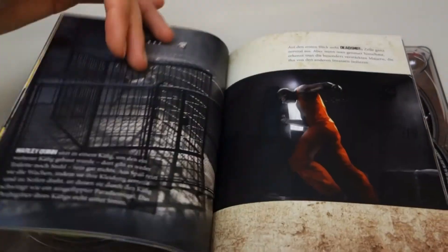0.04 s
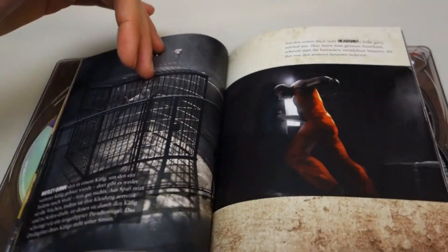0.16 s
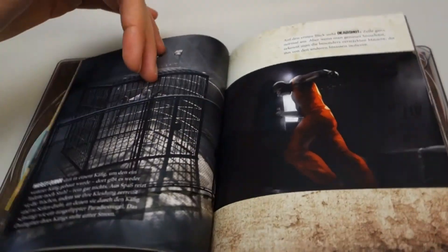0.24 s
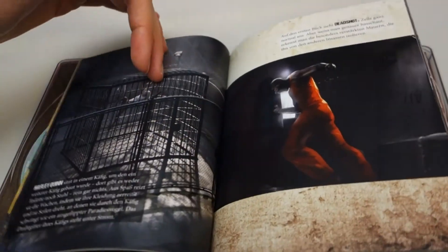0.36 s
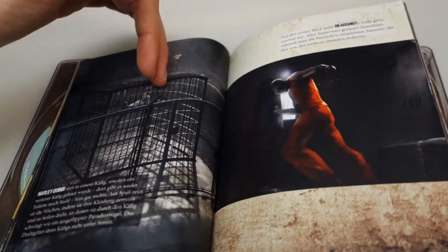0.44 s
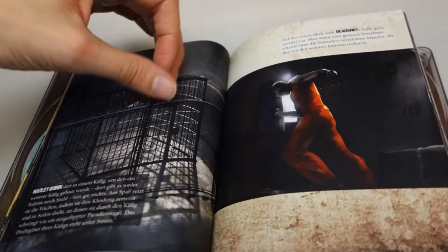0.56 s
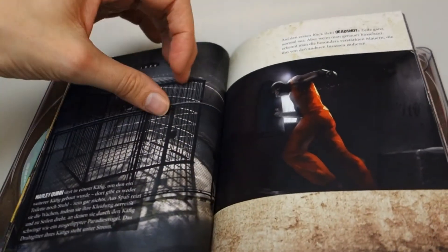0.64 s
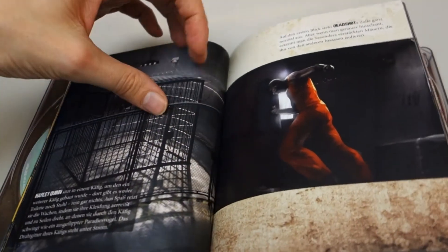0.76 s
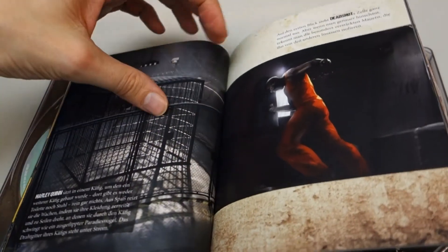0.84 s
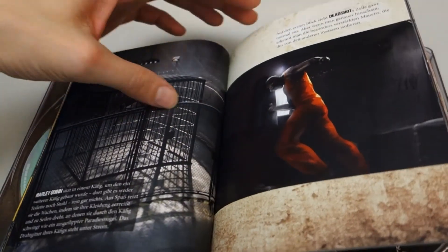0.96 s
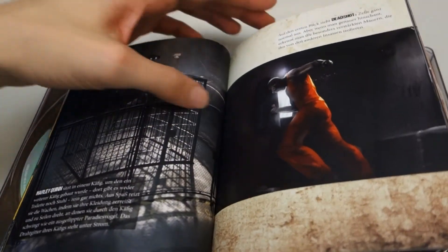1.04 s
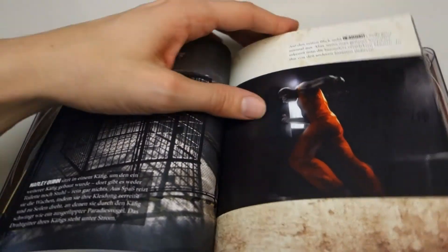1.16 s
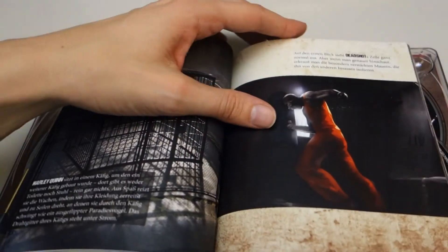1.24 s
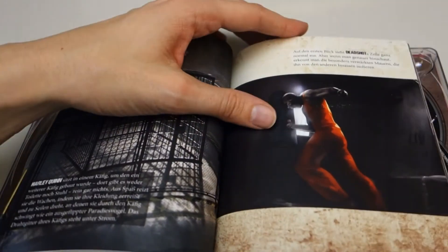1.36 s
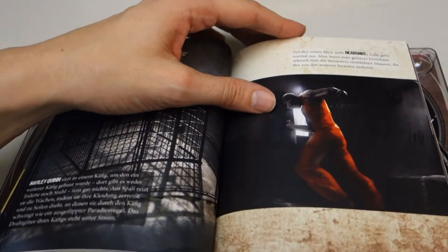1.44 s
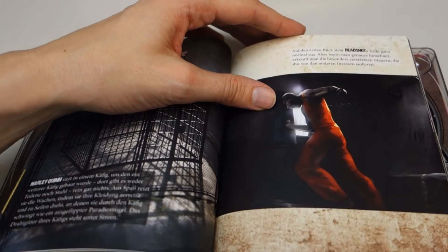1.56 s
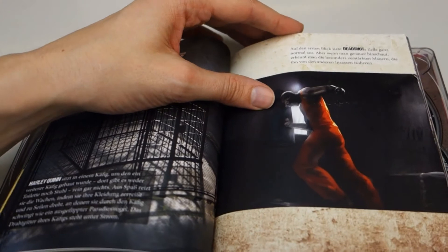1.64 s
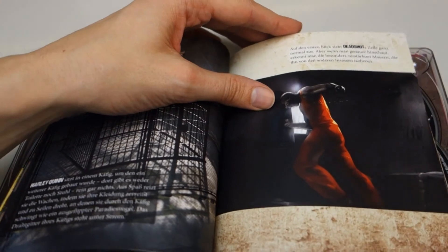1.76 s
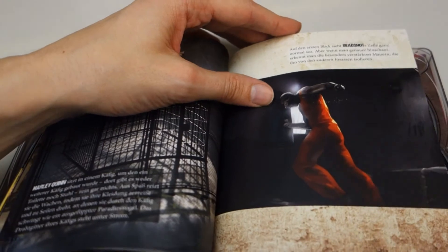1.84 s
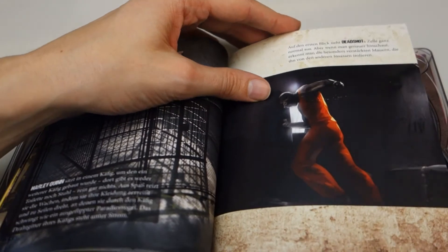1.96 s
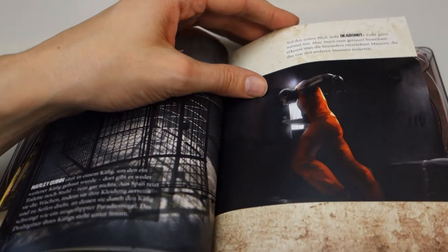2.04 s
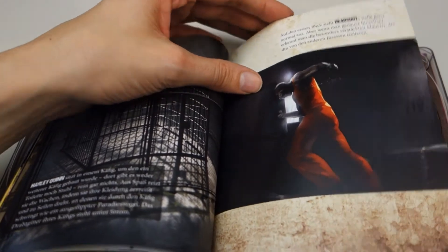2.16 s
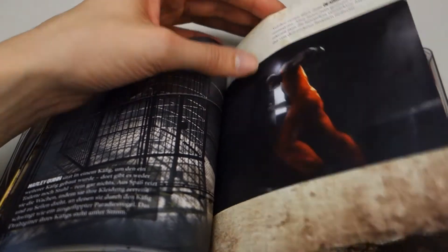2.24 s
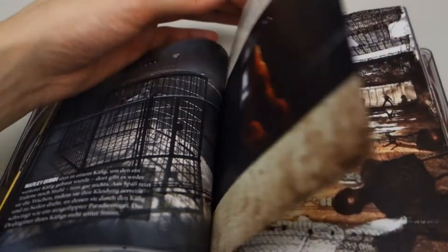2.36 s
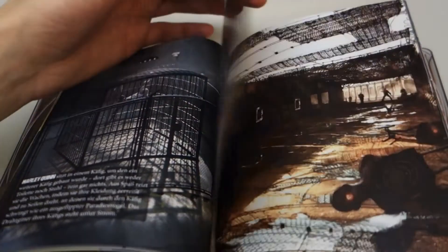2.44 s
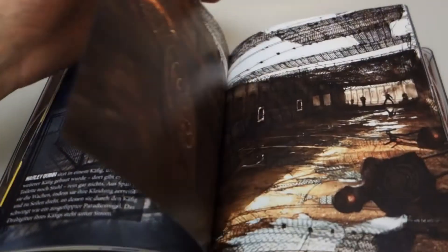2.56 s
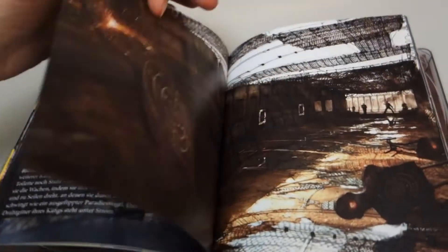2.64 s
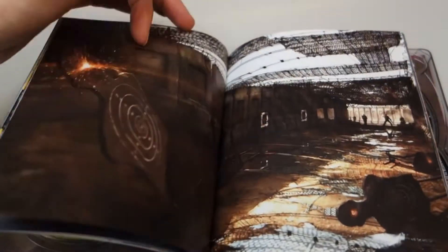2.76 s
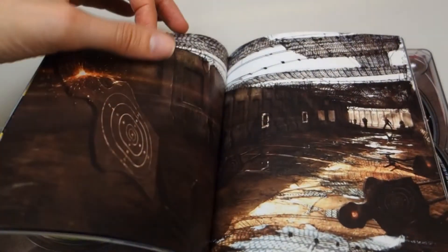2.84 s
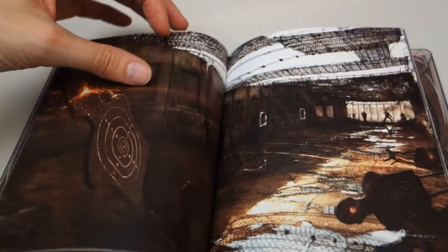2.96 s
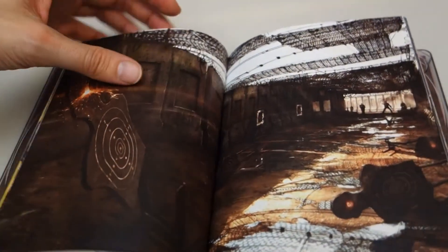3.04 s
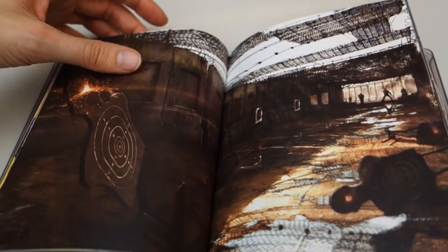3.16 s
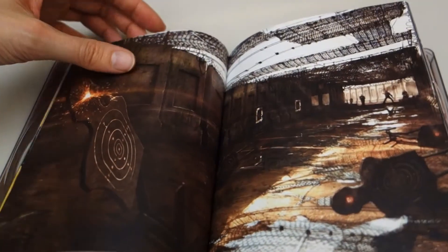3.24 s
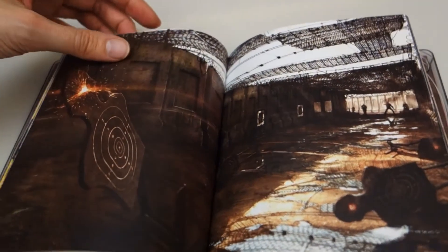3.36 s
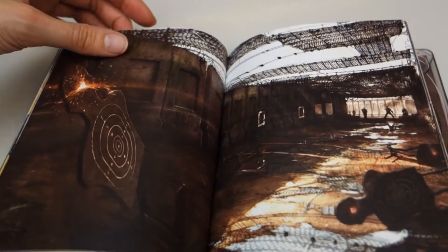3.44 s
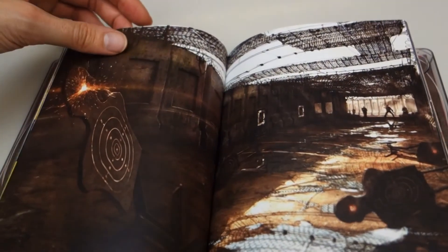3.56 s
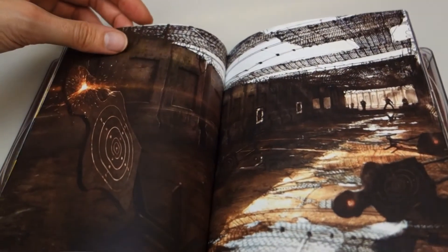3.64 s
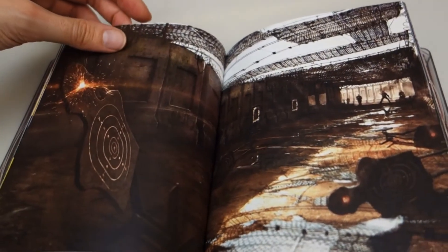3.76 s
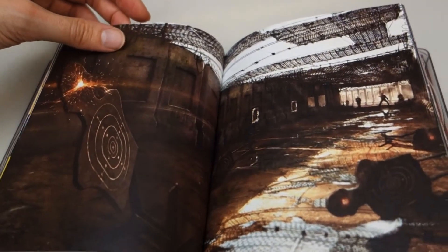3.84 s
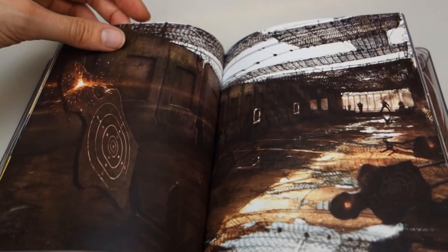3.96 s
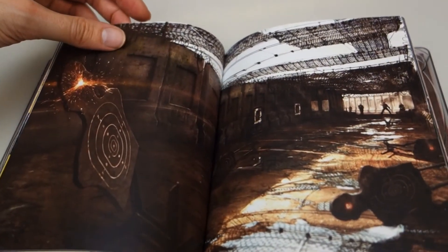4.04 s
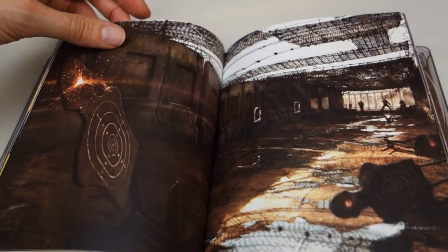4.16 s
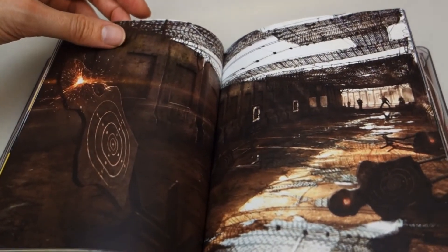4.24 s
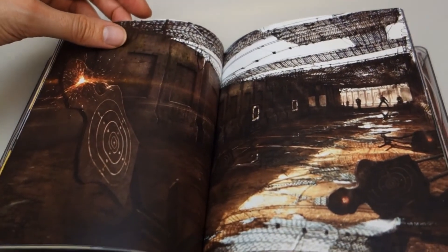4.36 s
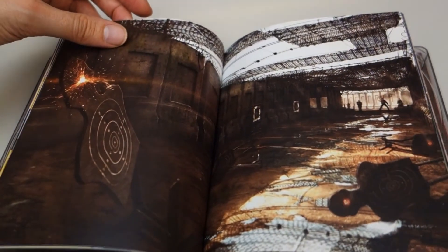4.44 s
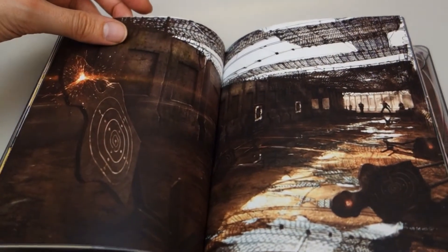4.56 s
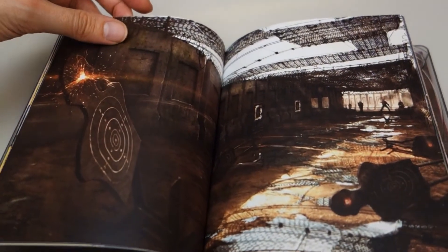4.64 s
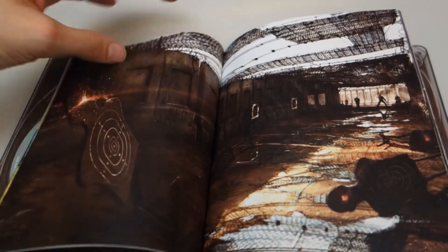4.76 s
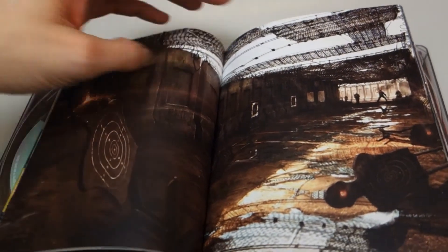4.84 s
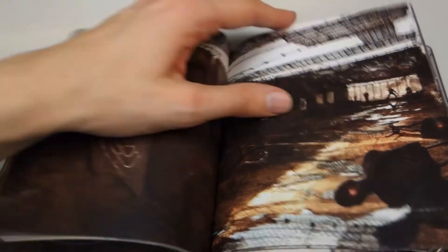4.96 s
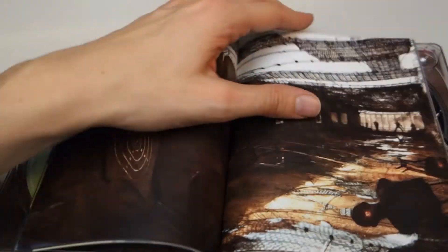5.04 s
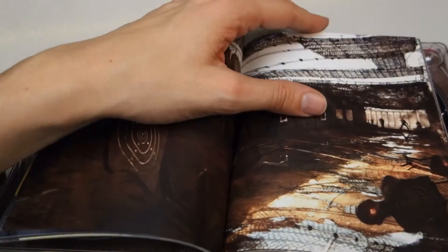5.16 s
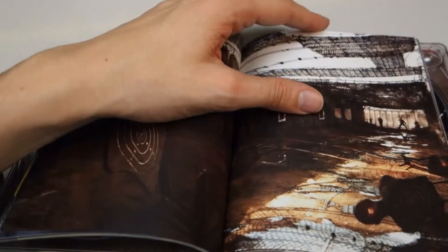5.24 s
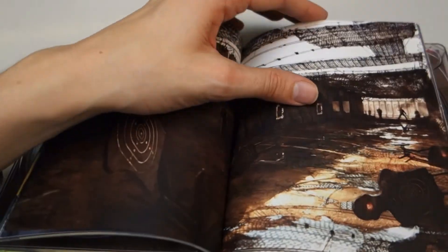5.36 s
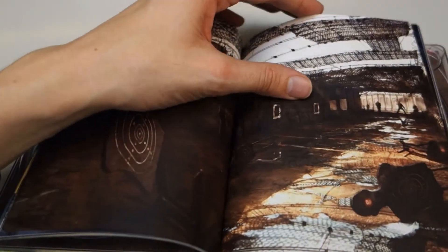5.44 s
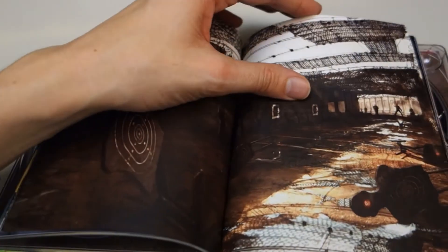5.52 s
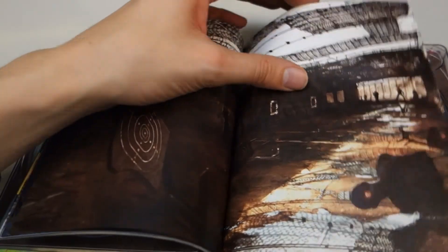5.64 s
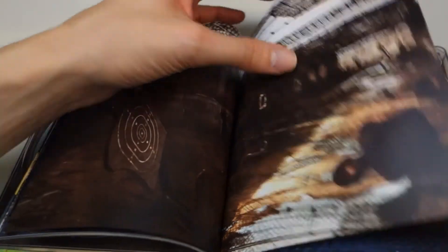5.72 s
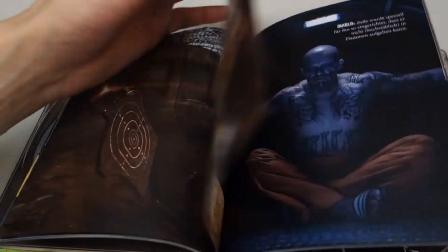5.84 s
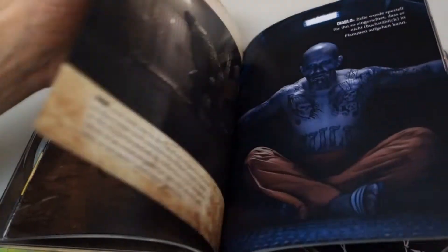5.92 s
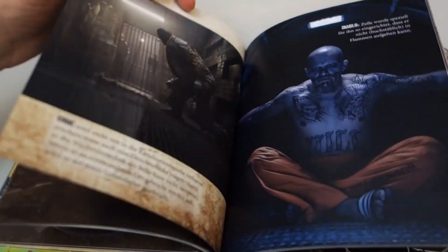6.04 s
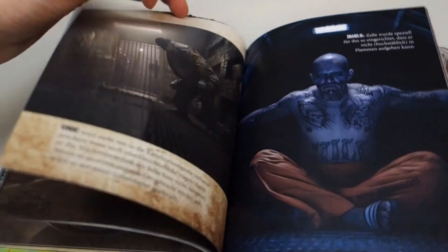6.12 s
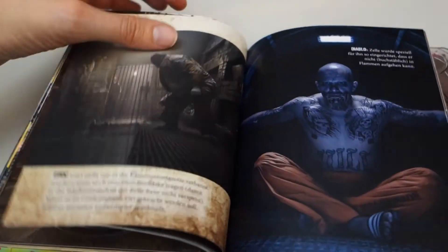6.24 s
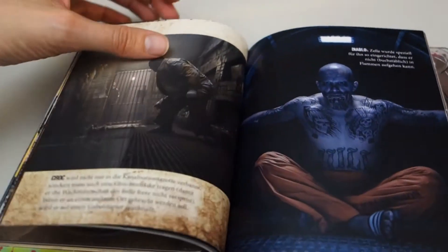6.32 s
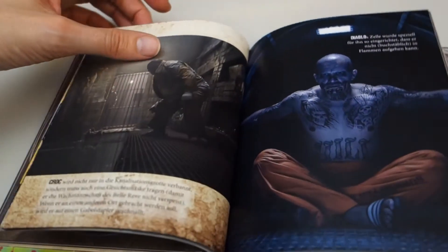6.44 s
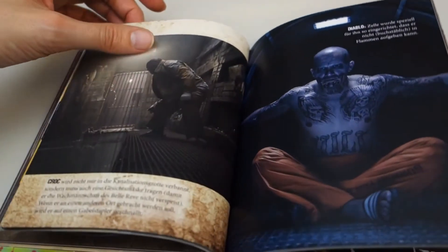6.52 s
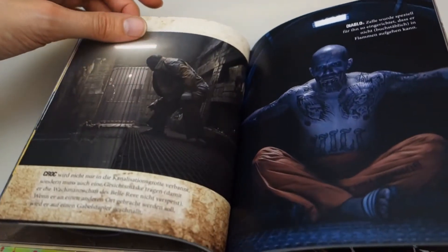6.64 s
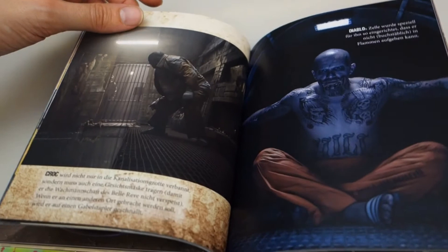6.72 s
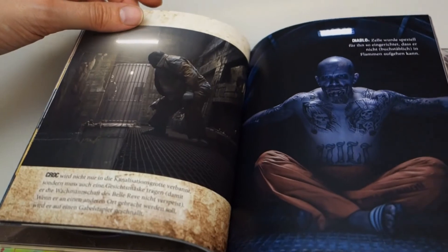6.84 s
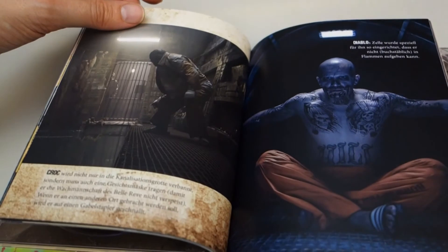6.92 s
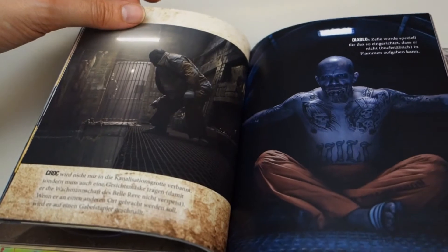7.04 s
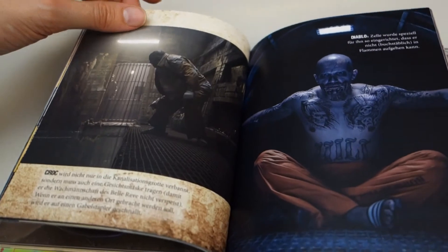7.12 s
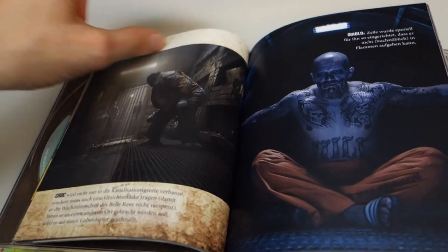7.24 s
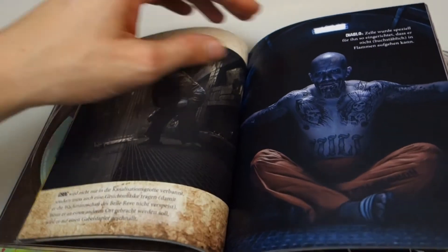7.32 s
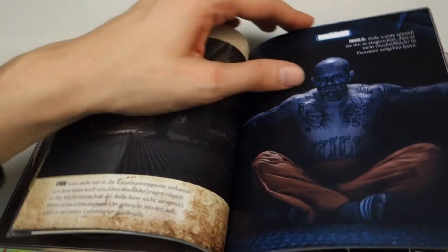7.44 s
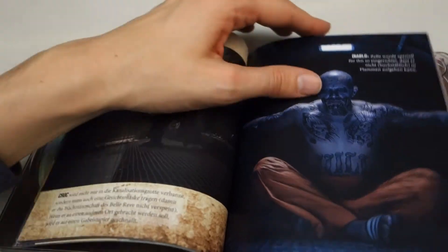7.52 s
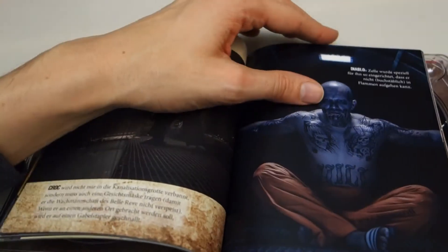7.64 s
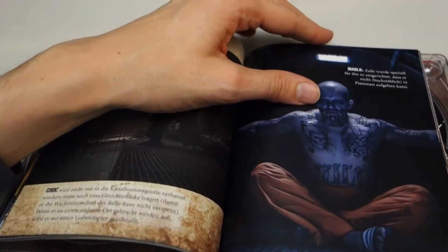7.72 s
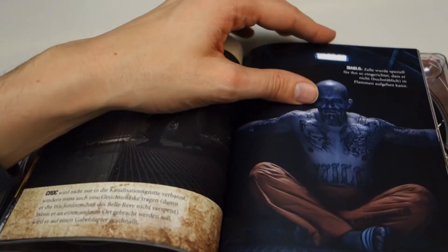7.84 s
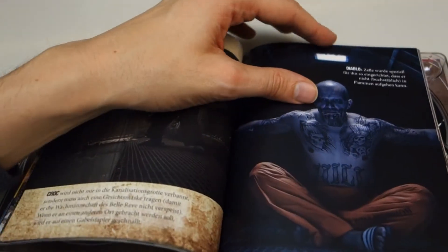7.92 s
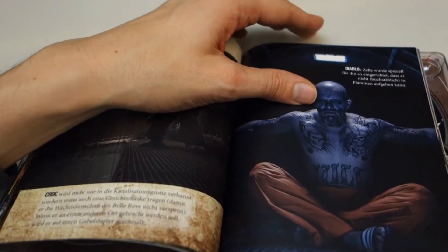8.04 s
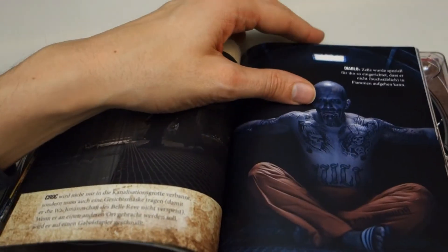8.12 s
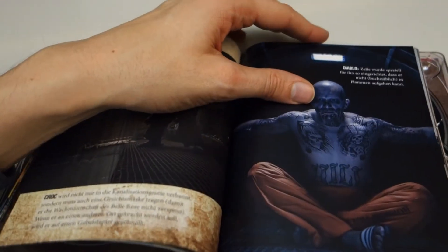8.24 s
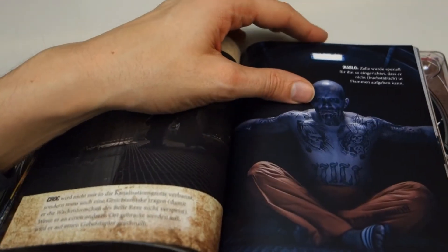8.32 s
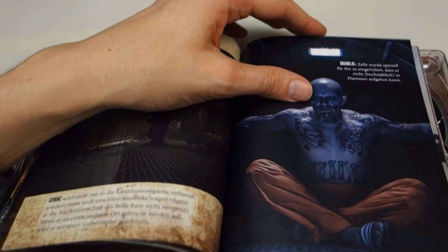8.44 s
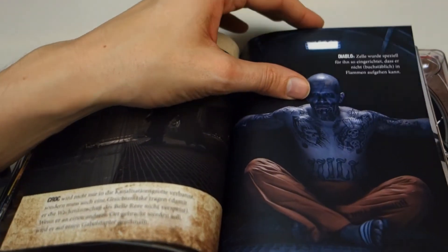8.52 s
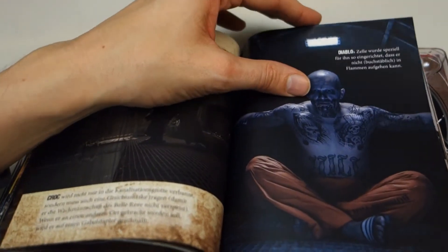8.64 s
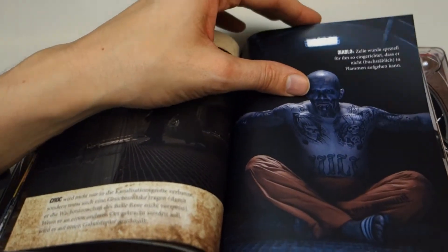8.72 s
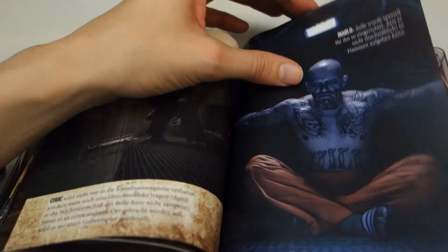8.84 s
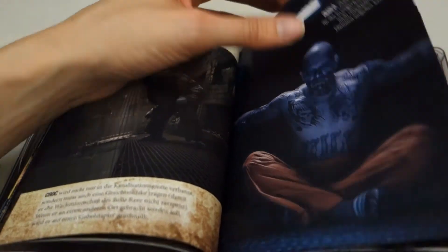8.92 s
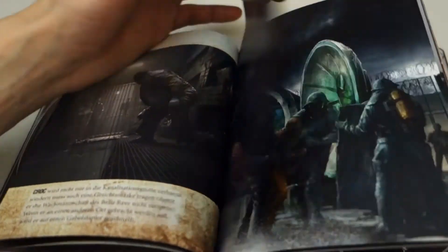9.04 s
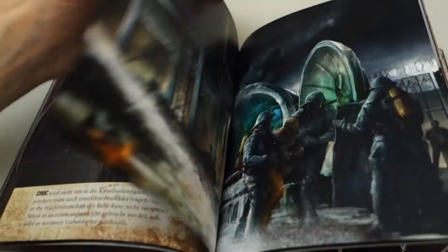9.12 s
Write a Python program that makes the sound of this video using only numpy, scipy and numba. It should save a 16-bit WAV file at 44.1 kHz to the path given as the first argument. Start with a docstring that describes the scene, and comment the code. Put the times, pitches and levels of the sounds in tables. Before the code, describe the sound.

A hand leafs through a thick book on a table in a quiet room. Skin slides over glossy paper, then a page turns with a swish and a crisp snap. After a short pause come louder rustles, crackles and further page turns, with dull thumps as the hand lands. The paper sounds close and brighter on the right, over faint rumble and hiss.

```python
"""Glossy pages of a thick book are lifted, slid and turned by hand on a table in a quiet room.
Sliding friction of skin and sheets radiates noise in strokes, and the stiff paper snaps as it buckles.
A leaning hand and soft blows drive the modes of the table top, which booms over faint rumble and hiss.
The right port of a two-port microphone faces the book; the left one is shaded in the treble."""
import sys
import numpy as np
from scipy import signal
from scipy.fft import rfft, irfft, next_fast_len
from scipy.io import wavfile
from scipy.ndimage import uniform_filter1d
from numba import njit

SR = 44100
rng = np.random.default_rng(int(sys.argv[2]) if len(sys.argv) > 2 else 0)


def generate_wav(signal):
    """Clip the signal to [-1, 1] and save it as 16-bit WAV at the path in sys.argv[1]."""
    frames = np.transpose(np.atleast_2d(signal))
    scaled = np.clip(frames, -1, 1) * 32767
    pcm = np.round(scaled).astype(np.int16)
    wavfile.write(sys.argv[1], SR, pcm)


N = 405279

# Levels are relative: each source applies its own gain. Coherence is clipped to 0..1 in use.
# background spectral density: f/Hz, level/dB
AIR_SPECTRUM = [(15, -20), (28, -10.5), (50, 5), (68, -11.5), (100, -8.5), (200, -7.5), (400, -13.5),
                (750, -18), (1000, -25), (1700, -20.5), (3500, -25.5), (8000, -25.5), (13000, -29.5),
                (16500, -25.5)]
# likeness of the background at the two ports: f/Hz, coherence
AIR_COHERENCE = [(60, 1), (130, 0.78), (290, 0.3), (640, -0.81), (1410, -2.2), (3100, -0.09), (6820, -0.02),
                 (15000, -0.03)]
# background balance: f/Hz, left minus right/dB
AIR_BALANCE = [(60, 1.5), (110, -4), (200, 0.0), (380, 0.5), (700, -4), (1290, -2.5), (2380, -4),
               (4400, -3.5), (8120, 0), (15000, -4)]
# resonances of the table top, the lowest row a faint wavering hum: f/Hz, bandwidth/Hz, level/dB
TABLE_MODES = [(58.4, 24, -7), (85, 22.6, 12), (137.5, 15, 1), (171.3, 18, 0), (199.8, 31, -4),
               (268.2, 19.5, 0.5), (330.5, 23.4, 2), (454, 62, -3.5), (548, 170, -13)]
# weight shifting on the table, in spans: t/s, level/dB, deep modes/dB, upper modes/dB
LEANING = [
    [(0.0, -68, 5, -7), (0.21, -71, -5, -7), (0.356, -77, 0, -3), (0.72, -74, 0, -2), (0.81, -87, 16, 6),
     (0.95, -87, 1, 4), (1.058, -66, -2, -21), (1.07, -61, -2, -9)],
    [(1.08, -59, 0, -3), (1.16, -52, 1, -13), (1.176, -50.5, 2, -0.5), (1.3, -48.5, 1, -0.5)],
    [(1.3, -47, -0.5, -5), (1.444, -52, 2, -6), (1.752, -61.5, -11, -11.5), (1.98, -65, 1, -3.5),
     (2.052, -74.5, 0, 4), (2.162, -67, -3, 0), (2.2, -72, -5.5, 4)],
    [(2.2, -69, 3, 0), (2.362, -73.5, -19, 4), (2.514, -73, 3, 9), (2.674, -75, -3, 9), (2.71, -66, -9, -6),
     (2.784, -54.5, -3, -3), (2.866, -63, -2, 1), (3.576, -71.5, -5, -3), (3.6, -77, 1, 0)],
    [(4.65, -72, -10, -9), (4.922, -64.5, 5, -3), (5.046, -46, -8, -5), (5.064, -42.5, 1, 9.5),
     (5.1, -47, 1, -2)],
    [(5.1, -38, -8, -6), (5.178, -47, -4, -1.5), (5.356, -51, 4.5, -8.5), (5.43, -50, -2.5, -8),
     (5.624, -67, 7, -2), (5.7, -63, 1, -3)],
    [(5.7, -62, -4, 7), (5.846, -60, -4, -11), (5.932, -58.5, -8, 6), (6.082, -70, 0.5, -1),
     (6.254, -55, 0, 2.5), (6.268, -56, -5, -1.5), (6.722, -73.5, -1, -4), (6.8, -78, 1, 6)],
    [(7.15, -80, 3, -4), (7.202, -78, 4, 6), (7.296, -55, -2, -19), (7.3, -53, -2, -17)],
    [(7.31, -49.5, -4, 1), (7.368, -49.5, -2, -4.5), (7.424, -57, 2, 5.5), (7.5, -50.5, -7, 1)],
    [(7.5, -52, -11, -5), (7.526, -51.5, -7, 0), (7.574, -48, -7, -10), (7.58, -48, -8, -5)],
    [(7.585, -45.5, -11, -2), (7.739, -50.5, 2.5, -5.5), (7.799, -50.5, -6, -11.5), (7.881, -61.5, 1, 3),
     (8.023, -60.5, 0.5, -5), (8.3, -78, -7, 6)],
    [(8.3, -73, -1, 3), (8.604, -66, -12, -7), (8.622, -68, -9, -2.5), (8.688, -80, 4, 5),
     (8.746, -76, -4, -4), (9.066, -64.5, -3, 2.5), (9.19, -64, -12, -1)],
]
# the hand lands or a stack of pages drops: t/s, peak level/dB, upper modes/dB
BLOWS = [(1.084, -45, 4), (1.171, -38, 1), (1.249, -37, 0), (2.739, -48, 1), (4.995, -34, -5),
         (5.055, -34, -9), (5.932, -45.5, 1), (6.238, -41, 1), (7.315, -37, -3), (7.409, -40, -3),
         (7.583, -34, -4)]
# shading of the left port: f/Hz, factor on the left-right level difference
SHADING = [(300, 0), (700, .25), (1300, 0.58), (2400, 1.2), (4400, 0.8), (8100, 1.2), (15000, 1.2)]
# likeness of the paper sound at the two ports: f/Hz, coherence
PAPER_COHERENCE = [(300, .95), (700, .9), (1400, 0.6), (3000, 0.7), (7000, 0.3), (15000, 0.3)]
# a sheet buckles: t/s, peak level/dB, f/Hz, bandwidth over f, tick/dB, time scale/ms,
# left minus right before shading/dB
BUCKLES = [(1.128, -31.5, 8960, 0.88, -14, 10, -14), (1.2452, -25.5, 1180, 0.53, 1, 1.8, -16),
           (1.2672, -29, 1680, 1, -3, 3, -16), (1.566, -33.5, 3520, 0.59, -0.5, 1.5, -18),
           (1.9616, -42, 1400, 0.41, -6, 2.0, -11), (2.1153, -38, 2670, 0.47, -5, 5.4, -12),
           (2.1358, -36, 3970, 0.89, -8, 2, -15), (2.314, -39, 2990, 0.49, -6, 2.5, -15),
           (2.321, -40, 2890, 0.38, 6, 2.0, -16), (2.3267, -33.5, 2990, 0.25, 0.5, 4, -22),
           (2.4488, -37, 990, 0.77, -5, 4.7, -9), (2.521, -36.5, 1360, 0.32, -5, 14, -14),
           (2.6525, -30.5, 2500, 0.41, -13, 2.0, -9), (2.7297, -33.5, 2900, 0.24, -8, 4.2, -13),
           (2.7533, -19.5, 2820, 0.28, -0.5, 4.6, -10), (2.7849, -30.5, 3040, 0.35, 1, 8.6, -12),
           (2.8887, -35, 8980, 0.69, -10, 2.5, -13), (4.8833, -28, 9300, 0.4, -12, 5.3, -14),
           (4.9743, -37, 7280, 0.72, -4, 10, -13), (4.9797, -30, 2920, 0.24, -1, 4.5, -11),
           (4.9875, -19.5, 1620, 0.75, -8, 2.8, -12), (5.0557, -13, 900, 0.51, 0, 1.8, -18),
           (5.0611, -24, 720, 0.13, -2, 3.6, -12), (5.0705, -20, 1030, 0.53, -4, 3.8, -20),
           (5.2224, -33, 8870, 0.52, -15, 1.3, -16), (5.2282, -25, 9100, 0.89, -13, 0.95, -18),
           (5.239, -30, 1550, 0.96, 0, 3.1, -13), (5.4085, -30, 1710, 0.2, 2, 2.2, -16),
           (5.4167, -29.5, 5900, 0.45, -9, 3.7, -20), (5.6672, -33, 5300, 0.45, -11, 1.5, -15),
           (5.6727, -31, 5120, 0.45, -12, 2.5, -16), (5.695, -36, 5190, 0.61, -10, 2.5, -15),
           (5.7052, -16, 3810, 0.64, -12, 1.6, -21), (5.7324, -15, 3750, 0.63, -13, 1.5, -16),
           (5.7433, -29, 3140, 0.28, -3, 8.5, -19), (5.8656, -16, 1330, 0.32, -28, 5.8, -16),
           (5.8842, -35, 1330, 0.16, -15, 6.0, -10), (5.899, -35, 1030, 0.65, -7, 15, -12),
           (5.9241, -27.5, 1330, 0.28, 0, 8.1, -11), (5.9431, -26, 1770, 0.5, -1, 3, -11),
           (6.1276, -29.5, 2600, 0.28, 0, 7.0, -13), (6.1486, -24, 1290, 1, -9, 11, -7),
           (6.194, -31, 8900, 0.25, -21, 3.6, -14), (6.2134, -23, 3100, 0.28, -5, 2.2, -11),
           (6.2193, -31.5, 2000, 0.51, -8, 5.4, -4), (6.2386, -33, 2990, 0.57, -6, 3.0, -10),
           (6.2406, -32.5, 1660, 0.5, 5, 10.0, -7), (7.4293, -40, 8450, 0.67, -10, 8.5, -13),
           (7.578, -34, 1700, 0.24, -4, 4.3, -11), (7.5857, -30, 6180, 0.79, -3, 11, -18),
           (7.6023, -27.5, 2880, 0.59, 4, 5.4, -14), (7.7967, -33, 8980, 0.97, -2, 4.4, -19),
           (7.8073, -38, 8980, 0.93, -12, 1.8, -18), (7.8143, -35, 8980, 0.91, -15, 1.7, -15),
           (7.8602, -24.5, 1530, 0.68, -5, 1.2, -12), (7.8707, -29.5, 4630, 0.32, 2, 1.4, -16),
           (7.8757, -38, 8460, 0.82, -17, 3.1, -16), (7.8896, -40, 5120, 0.41, 1, 3.0, -14),
           (7.8976, -40, 4760, 0.45, 2, 2.5, -14), (7.91, -23.5, 4740, 0.2, 9, 1.5, -23),
           (7.919, -31, 8950, 0.61, -18, 3.4, -22), (7.9256, -29.5, 9300, 0.17, -16, 3.6, -24),
           (8.2217, -31, 8660, 1, -10, 4.5, -12), (8.5451, -37, 3880, 0.46, 6, 2.0, -14),
           (8.5734, -29, 6150, 0.62, 3, 2.5, -10), (8.589, -22.5, 9600, 0.69, -24, 6, -17),
           (8.8235, -39, 7840, 0.4, -14, 3.1, -10), (8.831, -37, 8500, 0.34, -17, 5.1, -15),
           (8.841, -39, 3170, 0.38, -5.5, 10.5, -19.5), (8.937, -22, 2920, 0.74, -16, 1.7, -16),
           (8.9503, -30, 3640, 0.51, -5, 3.8, -19), (9.0877, -31.5, 1580, 0.75, -6, 3.1, -13)]
# where on the book the hand works: t/s, left minus right before shading/dB
HAND_BALANCE = [(0, -12.5), (.7, -14), (1.1, -15.5), (1.5, -21), (2, -17), (2.5, -14), (2.8, -12),
                (3.5, -13), (4.7, -9), (5, -17), (5.5, -20), (5.85, -19), (6.1, -12), (6.7, -16),
                (7.25, -11), (7.5, -21), (8, -23), (8.5, -13), (9.19, -20)]
# spectral density of paper friction: f/Hz, level/dB
FRICTION_SPECTRUM = [(350, -35), (600, -34.5), (1000, -30), (1300, -33.5), (1650, -28.5), (2300, -36.5),
                     (2900, -36), (4300, -36.5), (5300, -39), (7000, -37.5), (11500, -38.5), (14000, -44),
                     (16500, -48)]
# paper and skin sliding: t/s, level/dB, treble sheen/dB, hollow under the sheet/dB, sheet flex/dB
STROKES = [(0.0, -56.5, 5, -6, -15), (0.047, -50, -5, -12, -20), (0.06, -54.5, -8, -12, -16),
           (0.112, -53.5, -2, -12, -16), (0.147, -69.5, -1, -3.5, -8), (0.487, -66, -3.5, 0.5, -0.5),
           (0.576, -61.5, -1.5, 0.5, -3), (0.617, -55, 3.5, -5, -4), (0.705, -63, 11, -4, -8),
           (0.732, -68, 2, -4, 1), (0.901, -76, -2, 0, -3), (0.911, -61, 1, -5.5, -5),
           (1.027, -56.5, 14.5, -7, -8), (1.103, -57.5, 20, -11, -17), (1.132, -50.5, 9.5, -2.5, -11),
           (1.197, -53.5, 5.5, -11, -7), (1.228, -56, 11, -5, -7), (1.25, -44, -7, -6, -1),
           (1.268, -56, -4, -4, 1), (1.299, -68.5, -5, -1, 5), (1.381, -69, -1, 1, -2),
           (1.398, -47, -3, -11, -15), (1.411, -54, 8.5, -15, -13), (1.473, -56, 7, -11, -13),
           (1.506, -67, -2, -4, -5.5), (1.618, -71, 0, 1, 7), (1.664, -59, 1, -5, -9),
           (1.687, -67, -5, -6, 0), (1.826, -69, 1, -1, -6), (1.845, -62, -2, 4, -8),
           (1.872, -48, 4.5, -17, -16), (1.911, -65.5, -4, 3, -9), (1.955, -71, -2, -3, -5),
           (1.97, -54, -5, -6, -16), (1.988, -54.5, -6, -3.5, -15), (2.053, -57, -7, 0.5, -4),
           (2.094, -68, -2, -4, -7), (2.122, -58, -6, -14, -2), (2.141, -56, -5, -8, -9),
           (2.157, -52, -2, -5, -14), (2.185, -58, 1, 2, -10), (2.22, -68, -5, -1, -2),
           (2.293, -69, -4, 3, 1), (2.326, -57, -11, -5, -0.5), (2.347, -60.5, -5, 1, -9),
           (2.385, -52.5, -4.5, -3.5, -13), (2.432, -56.5, -3, -2, -11), (2.499, -53, 1, -2, -6),
           (2.543, -57, 1, -1, 1), (2.611, -58, 10, -13, -16), (2.66, -55.5, -2, -4, -4),
           (2.693, -48, -4, -14, -16), (2.713, -58.5, -1, 1, -8), (2.754, -37, -11, -11, -17),
           (2.769, -51.5, -1, 2, 4), (2.79, -46.5, -2, -1, -1), (2.806, -53.5, -6, -8, -13),
           (2.872, -57.5, -4, -8, -12), (2.882, -66, -4, -1, -4.5), (2.896, -52.5, 5.5, -10, -15),
           (2.939, -55, 9, -10, -18), (2.975, -57, 9, -9, -17), (3.003, -69.5, 0, -4, -10),
           (3.127, -58.5, 7, -10, -9), (3.183, -64, 2, -10, -10), (3.225, -56, 2.5, -19, -24),
           (3.266, -69.5, -4, -2.5, -11), (3.38, -58.5, 8.5, -16, -22), (3.427, -65.5, -4, -9, -7),
           (3.478, -60, -0.5, -9.5, -6.5), (3.592, -78, -3, -1, -7), (4.669, -83.5, 6, 3, -5),
           (4.707, -62, -1, -14, -11), (4.74, -71, 0, -7, -5), (4.767, -50, 1, -12, -14),
           (4.793, -63, 1, -3, -8), (4.822, -53.5, 0.5, -8, -13), (4.869, -50, 8, -6, -17),
           (4.885, -52, 18.5, -12, -13), (4.896, -67, 4, -10, -8), (4.904, -64, 4, -8, -8),
           (4.923, -70, 1, -4, -4), (4.933, -52, 10, 1, -5), (4.941, -47, -1, 1, -7),
           (4.964, -54, 8, -3, -12), (4.988, -47, 1, -1, 5), (5.009, -47, 8, 1, -4),
           (5.045, -53, -3, -1, -3), (5.06, -36.5, -6.5, -1.5, 2), (5.073, -33.5, -4, -3, 0),
           (5.125, -52, -3, 6, 6), (5.149, -59.5, -8, 4, 7), (5.207, -65, -5, 6, 10.5),
           (5.228, -48, -5, -8, -8), (5.261, -65.5, -13, 4, 6), (5.29, -53, -1, -7, -3),
           (5.315, -68, -3, 0, 3), (5.342, -70, -1, 3, 5), (5.358, -53.5, -4, -14, -9),
           (5.379, -64.5, 4, 6, 6), (5.415, -49, -6, -5, -11), (5.447, -43, -6, -16, -21),
           (5.473, -48, -6.5, -2, -20), (5.504, -60, -6, -1.5, -15), (5.605, -64.5, -10, -1.5, -11),
           (5.646, -43, 0, 0, -23), (5.657, -44.5, -4, -5, -22), (5.683, -63, -11.5, -1, -9),
           (5.708, -43.5, -11, -4, 0.5), (5.723, -48, -16, 2, -4), (5.751, -39, -9, -5.5, -8.5),
           (5.772, -41.5, -7, -10, -20), (5.787, -47, 3.5, 2, -10), (5.842, -46.5, 6, -4.5, -16),
           (5.873, -54, 3, 8, 1), (5.925, -45.5, 3, -7, -4), (5.939, -53.5, -3, 5, 10.5),
           (5.998, -56.5, 6, -3, -5), (6.033, -55, -7, -3, -1), (6.062, -58, -3, -1, -5),
           (6.079, -49, -2.5, -3, -6), (6.104, -50.5, -1, -11, -15), (6.128, -44, -6, -11, -7),
           (6.163, -56.5, -8, 2, 2), (6.194, -47.5, -2, -6, -7), (6.207, -59, -11, 4, -7),
           (6.22, -48, 5, 2, -2), (6.232, -55.5, -18.5, 4, 14), (6.248, -46.5, 2, -11, -3),
           (6.272, -55.5, -2, 0, -6), (6.306, -54, 7.5, -7, -7), (6.342, -62, -7, -4, -2),
           (6.582, -58.5, 3, -19, -20), (6.638, -56, -4, -12, -23), (6.665, -66, -6, -4, -3),
           (6.679, -56, -3, -9, -7), (6.69, -55, 1, -17, -19), (6.805, -74.5, -2, 0, -5),
           (7.104, -82, 0, -1, -5), (7.204, -61, 4, -10, -15), (7.242, -66, -2, -3, -7),
           (7.263, -51, -5, -16, -21), (7.279, -48, -5.5, -14, -22), (7.326, -55.5, 14.5, -14, -12),
           (7.347, -67, 3, -6, -6), (7.402, -67, -1, 1, -2), (7.411, -56, 0, -8, -3),
           (7.432, -51, 5, 0.5, -5), (7.466, -50.5, 12, -11, -8), (7.506, -54, 3.5, -8, -8),
           (7.543, -62.5, 1, 3, -3.5), (7.565, -58, 3, -8, -7), (7.602, -47, -10, 5.5, 8.5),
           (7.655, -63, -7, 1, -2), (7.786, -73, -3, 3, 5), (7.805, -59, -2, 6, -3),
           (7.839, -66.5, 0, -7, -2), (7.876, -58, -2, -4, -2), (7.905, -63, 1, -4, 2),
           (7.923, -52, -1, 0, -5), (7.932, -50, 2, -7, -3), (7.953, -46, -2, -17, -12),
           (7.974, -70, -7, -1, -3), (8.001, -55, 7, -15, -6), (8.032, -72, 1, 8, 1),
           (8.214, -73, 1, -3, 1), (8.229, -49.5, 0, -1, -8), (8.243, -59.5, 8, -14, -11),
           (8.262, -65.5, -4, -8, -5), (8.444, -61.5, -5, 5.5, -8), (8.514, -64.5, -3, 7, -9),
           (8.597, -64.5, -14, 4, 1), (8.651, -69.5, -2, -1, -6), (8.82, -75, -4, 2, 1),
           (8.83, -46.5, -6, -2, -13), (8.843, -51, 7, -1, -6), (8.859, -51.5, -8, 4.5, -7),
           (8.882, -68, -3, 8, -6), (8.915, -54.5, -15, 5, -8), (8.956, -48, -11, -2, -10),
           (8.972, -46.5, 0, -6, -6), (8.993, -42.5, -3, -10.5, -19), (9.071, -54.5, 6.5, -3.5, -25),
           (9.121, -46, 4, -6.5, -5), (9.189, -77, 0, 2, -7)]


def undb(db):
    """Amplitude ratio of a level in decibels."""
    return 10 ** (np.asarray(db) / 20)


def unit(x):
    """Normalisation to rms 1."""
    return x / np.sqrt(np.mean(x ** 2))


def at_hz(points, hz):
    """Interpolation of (f/Hz, value) points on a logarithmic frequency axis."""
    f, values = np.transpose(points)
    return np.interp(np.log(hz), np.log(f), values)


def curves(spans):
    """Linear interpolation of each column of the joined spans at every sample."""
    times, *columns = np.concatenate(spans).T
    return [np.interp(np.arange(N) / SR, times, column) for column in columns]


@njit
def resonator(x, hz, width_hz):
    """Second-order resonance: a state-variable band-pass with gain 1 at the centre."""
    y, band_state, low_state = np.empty(len(x)), 0., 0.
    g, damping = np.tan(np.pi * hz / SR), width_hz / hz
    for i in range(len(x)):
        band = (band_state + g * (x[i] - low_state)) / (1 + g * (g + damping))
        band_state = 2 * band - band_state
        low_state += 2 * g * band
        y[i] = damping * band
    return y


def waver(rate_hz):
    """Random modulation: held values, smoothed twice, with a spread near 1."""
    hold = int(SR / rate_hz)
    steps = np.repeat(rng.standard_normal(N // hold + 1), hold)
    return 1.3 * uniform_filter1d(uniform_filter1d(steps, hold), hold)[:N]


def ports(near, other, coherence, balance_db):
    """Partial coherence: the right port hears one signal, the left a blend of it and a second path."""
    coherence, gain = np.clip(coherence, 0, 1), undb(balance_db)
    left = gain * (coherence * near + np.sqrt(1 - coherence ** 2) * other)
    return np.array([left, near]) * 2 / np.sqrt(1 + gain ** 2 + 2 * coherence * gain)


def background(level_db=-64):
    """Nearly stationary noise: rumble of the house and hiss of the microphone."""
    hz = np.maximum(np.arange(N // 2 + 1) * SR / N, 1)
    near, other = rfft(rng.standard_normal((2, N))) * undb(at_hz(AIR_SPECTRUM, hz))
    pair = irfft(ports(near, other, at_hz(AIR_COHERENCE, hz), at_hz(AIR_BALANCE, hz)), N)
    return pair / np.std(pair.mean(axis=0)) * undb(level_db + .5 * waver(2.92))


def reverberation(direct, t60_s=0.2, level_db=-22):
    """A diffuse field decays exponentially, duller than the direct sound and different at each port."""
    t = np.arange(SR // 2) / SR
    tail = rng.standard_normal((2, len(t))) * np.exp(-np.log(1000) * t / t60_s) * (t > .004)
    tail = np.array([resonator(side, 1000., 4300.) for side in tail])
    tail /= np.sqrt(np.sum(tail ** 2) / 2)
    return undb(level_db) * signal.fftconvolve(direct[None], tail)[:, :N]


def modal_response(force):
    """Modal superposition: the deep, middle and upper modes of the table top, each group at rms 1."""
    groups = np.zeros((3, len(force)))
    for hz, width_hz, db in TABLE_MODES:
        mode = resonator(force, float(hz), float(width_hz))
        mode = resonator(mode, float(hz), 4. * width_hz)  # steeper skirts
        groups[int(hz > 110) + int(hz > 220)] += undb(db) * unit(mode)
    return [unit(group) for group in groups]


def table_boom(contact_ms=2.4, blow_gain_db=-4):
    """Forced vibration under shifting weight and free decay after soft blows, alike at both ports."""
    level_db, deep_db, upper_db = curves(LEANING)
    deep, middle, upper = modal_response(rng.standard_normal(N) * undb(1.7 * waver(30)))
    out = undb(level_db) * (undb(deep_db) * deep + middle + undb(upper_db) * upper)
    ms = np.arange(SR // 5) * 1000 / SR
    deep, middle, upper = modal_response(ms / contact_ms * np.exp(-ms / contact_ms))
    for onset_s, db, upper_db in BLOWS:
        blow = deep + middle + undb(upper_db) * upper
        out[int(onset_s * SR):][:len(ms)] += undb(db + blow_gain_db) * blow / np.abs(blow).max()
    return out


def paper_snaps(rise=0.26, fall=0.52, gain_db=-2.5, tick_gain_db=-3, shade_gain=1.2):
    """Buckling releases a burst that rings at the resonance of the patch, with a bright tick on top."""
    ms = np.arange(4096) * 1000 / SR
    out = np.zeros((2, N + len(ms)))
    for onset_s, db, hz, spread, tick_db, scale_ms, balance_db in BUCKLES:
        envelope = (1 - np.exp(-ms / (rise * scale_ms))) * np.exp(-ms / (fall * scale_ms))
        bursts = rng.standard_normal((2, len(ms))) * envelope
        hz = float(hz)
        ring = [resonator(burst, hz, spread * hz) for burst in bursts]
        ring = unit(np.array([resonator(path, hz, 4.6 * spread * hz) for path in ring]))
        tick = unit(np.array([resonator(burst, 7900., 13000.) for burst in bursts]))
        tick *= undb(tick_db + tick_gain_db)
        pair = 0
        for paths, f in ((ring, hz), (tick, 9500)):
            shaded_db = shade_gain * at_hz(SHADING, f) * balance_db
            pair = pair + ports(*paths, at_hz(PAPER_COHERENCE, f) + 0.083, shaded_db)
        start = int(onset_s * SR)
        out[:, start:start + len(ms)] += undb(db + gain_db) * pair / np.abs(pair.mean(axis=0)).max()
    return out[:, :N]


def page_friction(gain_db=-0.79):
    """Stick-slip friction: countless uneven slips; the catch of the contact and of each band wavers."""
    level_db, sheen_db, hollow_db, flex_db = curves([STROKES])
    balance_db, = curves([HAND_BALANCE])
    grit = undb(2.0 * rng.exponential(size=N) + 0.55 * waver(60) + 1.5 * waver(250))
    slips = rng.standard_normal((2, N)) * unit(grit)
    size = next_fast_len(N)
    f = np.maximum(np.arange(size // 2 + 1) * SR / size, 1)
    spectra = rfft(slips, size) * undb(at_hz(FRICTION_SPECTRUM, f)) * np.sqrt(SR / 2)
    out = 0
    for hz in 425 * 2 ** np.arange(0, 5.5, 1 / 3):  # overlapping third-octave bands
        window = np.cos(np.pi * np.clip(1.5 * np.log2(f / hz), -.5, .5)) ** 2
        near, other = irfft(spectra * window, size)[:, :N]
        body_db = flex_db if hz < 1200 else hollow_db if hz < 2400 else 0
        sheen_weight = at_hz([(5500, 0), (10500, 1.06), (14000, 1.05)], hz)
        catch_db = 2.15 * waver(35) + 0.71 * waver(10)
        gain = undb(level_db + body_db + sheen_weight * sheen_db + catch_db + gain_db)
        out = out + gain * ports(near, other, at_hz(PAPER_COHERENCE, hz), at_hz(SHADING, hz) * balance_db)
    return out


def scene():
    """Linear superposition of the pages, their reverberation, the table and the background."""
    pages = page_friction() + paper_snaps()
    return pages + reverberation(pages[1]) + table_boom() + background()


def record(dry, cutoff_hz=15800):
    """Band limiting: a steep elliptic low-pass removes the highest treble."""
    return signal.sosfilt(signal.ellip(10, .2, 70, cutoff_hz, fs=SR, output="sos"), dry)


dry = scene()
out = record(dry)
generate_wav(out)
```